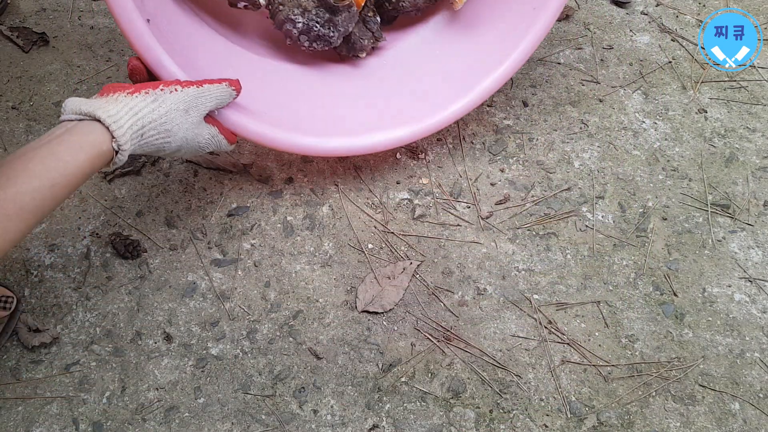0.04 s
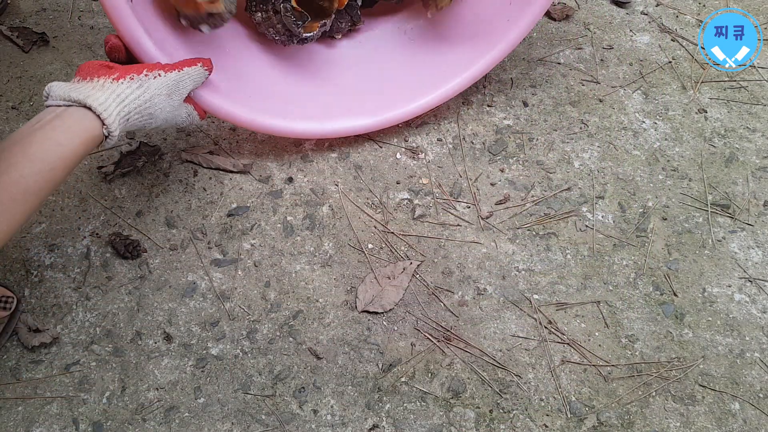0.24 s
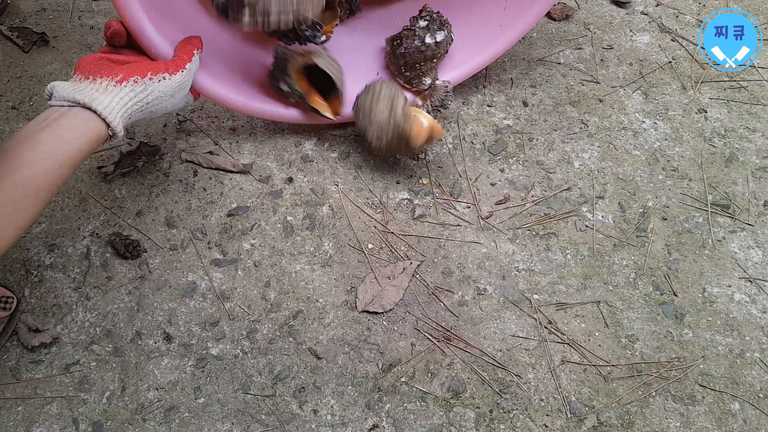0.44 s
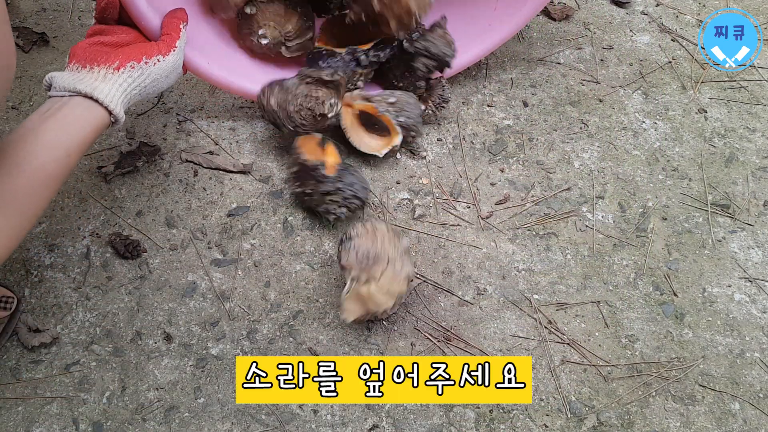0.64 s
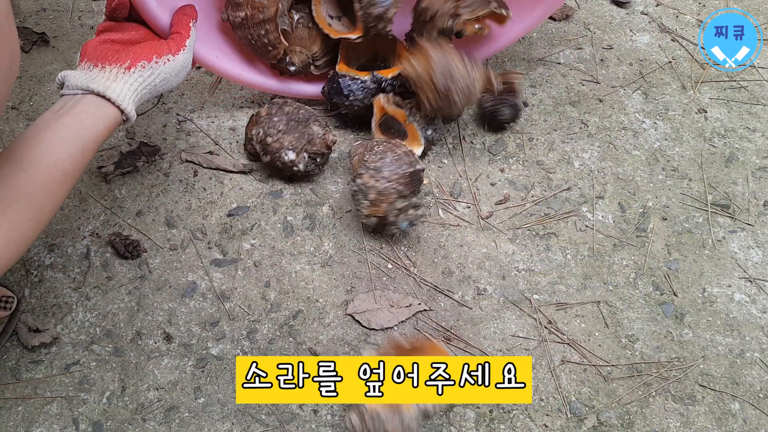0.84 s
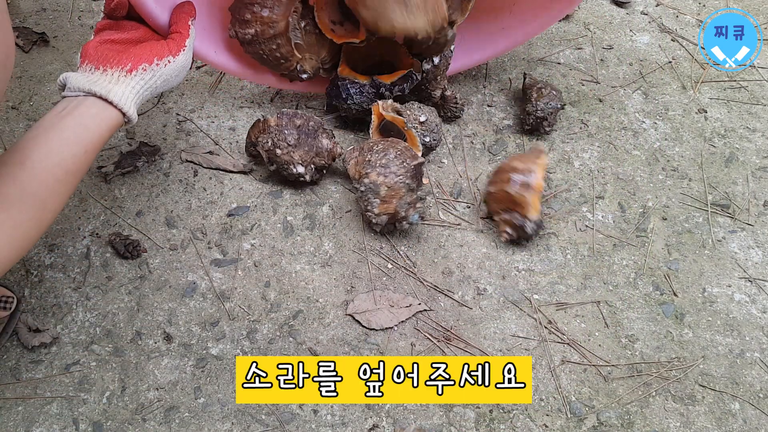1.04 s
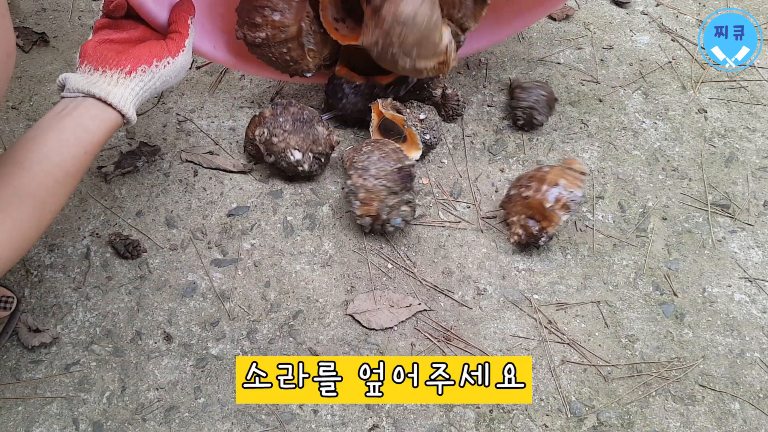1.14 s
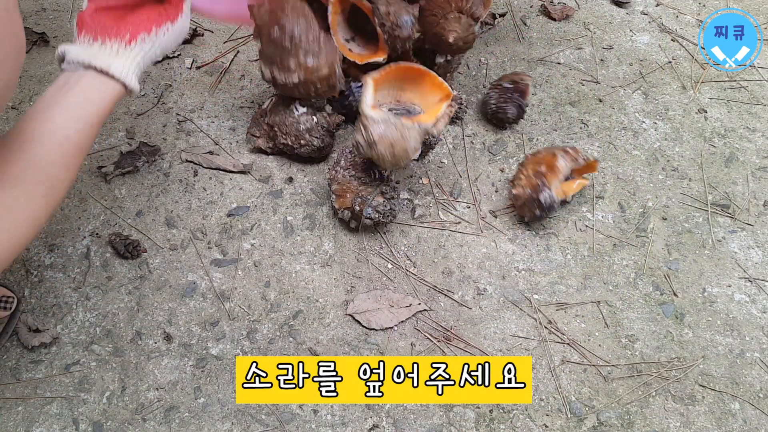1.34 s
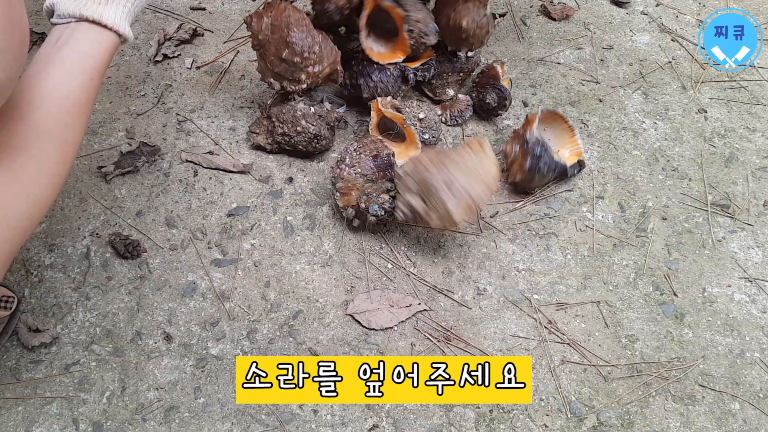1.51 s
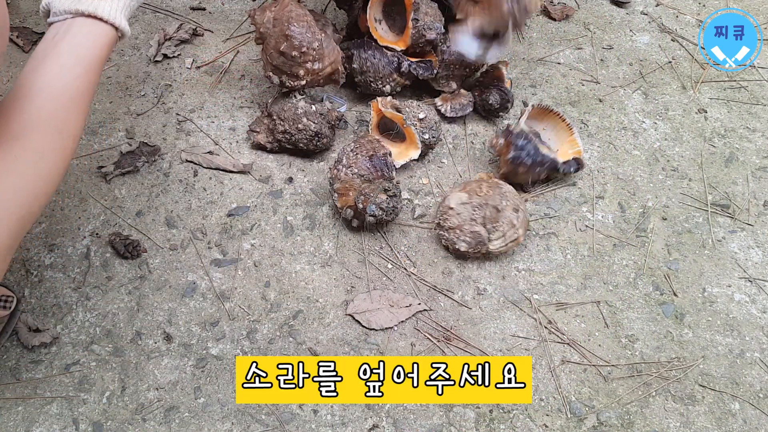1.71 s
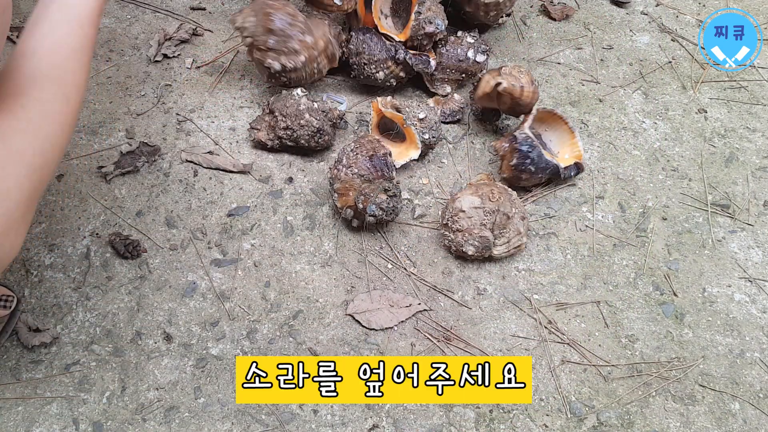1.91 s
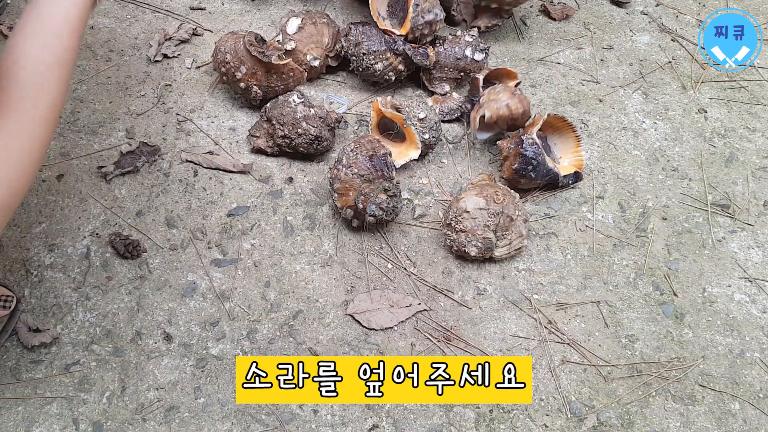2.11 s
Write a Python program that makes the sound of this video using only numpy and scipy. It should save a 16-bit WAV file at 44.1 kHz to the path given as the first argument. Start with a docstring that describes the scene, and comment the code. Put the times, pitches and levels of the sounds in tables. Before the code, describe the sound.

Heavy sea snail shells clatter from a plastic basin onto concrete, close up outdoors. Near silence until 0.1 s, then a dense, loud rattle of hollow knocks, hard raps, thin clinks and gritty crust crackle to about 0.9 s, with basin thumps and a low boom near 0.75. Sparser knocks follow, a renewed cluster at 1.35-1.5, a rap at 1.6, a thin shell bouncing brightly at 1.8, then light taps until about 2.1.

```python
"""Heavy sea snail shells slide out of a tipped plastic basin onto a concrete yard, close to two microphones.
Each blow excites decaying modes through a burst of contacts: hollow bodies knock, thin lips clink, thick
shells rap and the basin wall thumps. A dense rattle of random taps runs between the blows and thins out.
Crust cracks as bursts of filtered noise, and the basin booms as a slowly swelling and dying sine.
Short yard echoes and a quiet outdoor noise lie beneath."""
import sys
import numpy as np
from scipy import signal
from scipy.fft import rfft, irfft
from scipy.io import wavfile

SR = 44100
rng = np.random.default_rng(int(sys.argv[2]) if len(sys.argv) > 2 else 0)


def output_pcm(signal):
    """Save a mono or channel-first signal as 16-bit PCM at the path in sys.argv[1].

    Samples are clipped to [-1, 1] before scaling.
    """
    pcm = np.clip(np.atleast_2d(signal).T, -1, 1) * 32767
    wavfile.write(sys.argv[1], SR, np.round(pcm).astype(np.int16))


def invert_db(level):
    """Linear amplitude ratio for a level in decibels (20 dB per decade), elementwise."""
    return 10 ** (np.asarray(level, dtype=float) / 20)


N = 95388  # length of the scene in samples

# Spectrum of the outdoor background: (frequency [Hz], level [dB])
AIR_SPECTRUM = [(30, 7.5), (300, -12), (2500, -50), (5000, -14), (16000, -37)]
# Spectrum of crust and sand noise: (frequency [Hz], level [dB])
GRIT_SPECTRUM = [(2940, -1), (5000, 0), (6440, -4.5), (11700, -5), (15100, -5), (16000, -42)]
# Rattle between the blows: (time [s], level of shell bodies [dB], level of basin [dB])
RATTLE_LEVELS = [(0.066, -51, -44), (0.097, -26, -22.5), (.5, -24, -24.5), (0.757, -20.5, -26),
                 (.83, -32.5, -34), (.96, -36, -39), (1.02, -31, -36.5), (1.25, -29, -37),
                 (1.4, -20, -30.5), (1.679, -27.5, -36), (1.748, -41, -43), (2.16, -34, -42)]
# Crust cracking at hard contacts: (time [s], level [dB])
CRACKS = [(0.0907, -27), (0.179, -21.5), (0.2101, -17.5), (0.2782, -17), (0.4, -19.5), (0.468, -22),
          (0.508, -18), (0.5515, -18), (0.6455, -16), (0.7812, -17.5), (0.8646, -15), (0.9953, -18.5),
          (1.225, -28), (1.39, -24), (1.591, -21), (1.9371, -25.5)]
# Hollow knocks of shell bodies: (time [s], peak level [dB], pitch [Hz])
KNOCKS = [(0.11, -1.5, 974), (0.196, -4.5, 915), (0.211, -7.5, 890), (0.278, -10.5, 2075),
          (0.41, -1.5, 876), (0.445, 0, 1510), (0.461, -2, 890), (0.474, -2, 1136), (0.603, -6.5, 875),
          (0.648, -1, 1040), (0.684, -4, 993), (0.874, -6, 860), (1.005, -8, 1005), (1.028, -12, 946),
          (1.045, -16, 1580), (1.163, -12, 1274), (1.226, -11, 1323), (1.327, -14.5, 1584),
          (1.411, -13, 1626), (1.48, -6, 1386), (1.681, -14.5, 1740), (1.858, -18, 913),
          (1.863, -13.5, 1902), (1.946, -14.5, 1090), (2.002, -12, 1585), (2.098, -18, 1328)]
# Clinks of thin shell lips: (time [s], peak level [dB], pitch [Hz])
CLINKS = [(0.113, -13, 4810), (0.2114, -13, 3376), (0.2784, -21, 4020), (0.5092, -22, 4200),
          (0.5836, -7, 2870), (0.6486, -10.5, 3784), (0.6901, -6.5, 2970), (0.7376, -12.5, 4800),
          (0.7816, -12.5, 3814), (0.995, -15, 3810), (1.0221, -21.5, 4830), (1.1653, -13, 3430),
          (1.413, -11.5, 4624), (1.4504, -11, 4430), (1.545, -15, 4390), (2.0021, -16.5, 3940),
          (2.031, -16.5, 3900), (2.056, -16, 3460)]
# Shells thumping the basin wall: (time [s], peak level [dB], pitch [Hz])
THUMPS = [(0.202, -6, 264), (0.357, -12, 281), (0.448, -5.5, 240), (0.862, -15, 267), (1.637, -9, 234),
          (2.005, -21.5, 220)]
# Dry raps of a thick shell on concrete or on another shell: (time [s], peak level [dB], pitch [Hz])
RAPS = [(0.358, -5.5, 837), (0.399, 1.5, 1300), (0.552, -0.5, 1415), (0.584, 1, 1750), (0.866, -2, 740),
        (1.112, -3, 1623), (1.341, -6, 815), (1.361, -5.5, 920), (1.425, -3.5, 750), (1.434, -0.5, 983),
        (1.618, 0.5, 1274), (2.032, -11, 1000)]
# The whole basin booming: (time [s], level [dB])
BOOMS = [(.73, -18), (0.869, -31.5), (1.12, -33.5), (1.356, -20), (1.53, -25), (1.653, -27), (1.879, -28.5),
         (2.021, -29)]
# One thin shell bouncing on its own: (time [s], peak level [dB])
BOUNCES = [(1.791, -5.5), (1.807, -18.5), (1.819, -17)]
# Main modes of that thin shell: (frequency [Hz], level [dB], T60 [s])
THIN_SHELL_MODES = [(1905, -10, 0.078), (2391, 0, 0.048), (3954, 0.5, 0.064), (5220, -10, 0.076),
                    (10680, -14, 0.043)]
# Ways of ringing: (lowest mode [ratio to main], highest mode [ratio to main], crowd level [dB], T60 [s])
BODY_MODES = (0.8949, 1.8, -9, 0.0153)
WALL_MODES = (1.13, 2.0, -15, 0.08)
LIP_MODES = (.72, 1.25, -14, .035)
THICK_SHELL_MODES = (.55, 2.6, -5, .012)

# Phase between the microphones: mean lead of the left, and random spread up to 2 kHz
LEAD_RAD, SPREAD_RAD_PER_KHZ = 0.27, 0.97
CONTACTS_PER_S = 1500
KNOCK_S, CLINK_S, THUMP_S, RAP_S = 0.012, 0.0056, 0.0078, 0.0049  # decay constants of the contact bursts
RAP_RING_DB = -7  # body ringing added to the tap of a rap, relative to the dry part
LIPS_DB, GRIT_DB = -10, -8  # relative to the rattling bodies
GRIT_LEFT_DB = -1  # left over right, before the microphones
CRACK_T60_S, CRACK_TAIL_DB, TAIL_T60_S = 0.03, -0.5, 0.072
BOOM_HZ, BOOM_RISE_S, BOOM_T60_S = 58.6, 0.013, 0.34
RUMBLE_DB = -6.5  # relative to the rattling basin
YARD_DB, YARD_T60_S = -10, 0.053
AIR_DB = -52.5
LEFT_DB = 2.5  # gain of the left microphone over the right


def evened(x):
    """Normalization to unit rms."""
    return x / np.sqrt(np.mean(x ** 2) + 1e-20)


def add(mix, s, sound):
    """Linear superposition of a sound on the mix from time s, in place."""
    part = mix[:, round(s * SR):][:, :sound.shape[1]]
    part += sound[:, :part.shape[1]]


def coloured(points):
    """Spectral shaping: two channels of white noise are weighted by the given spectrum."""
    hz, db = np.transpose(points)
    bins = np.fft.rfftfreq(N, 1 / SR)
    gain = invert_db(np.interp(np.log(bins + 1), np.log(hz), db))
    white = rng.standard_normal((2, N))
    return evened(irfft(rfft(white) * gain, N))


def air():
    """Partial coherence: mixing two noises crosswise makes the background much alike at both microphones."""
    noise = coloured(AIR_SPECTRUM)
    return evened(noise + 0.79 * noise[::-1])


def ring(kind, main_hz, count=15):
    """Modal superposition: one tap excites a main mode and a crowd of weaker ones, phased per microphone."""
    lowest, highest, crowd_db, t60 = kind
    place = rng.random((count, 1))
    phase_draw, level_draw = rng.standard_normal((2, count, 1))
    main = np.arange(count)[:, None] == 0
    hz = main_hz * np.where(main, 1, lowest * (highest / lowest) ** place)
    t = np.arange(4000) / SR

    spread = np.where(main, phase_draw / 2, phase_draw)  # the main mode strays half as far
    turn = (LEAD_RAD + SPREAD_RAD_PER_KHZ * np.minimum(hz / 1000, 2) * spread) / 2

    octaves_away = abs(np.log2(hz / main_hz))
    mode_db = np.where(main, 0, crowd_db + 2 * level_draw - 5 * octaves_away)
    level = invert_db(mode_db - 60 * t / t60)
    level = level * (1 - np.exp(-t / 0.00016))  # the contact takes a moment
    return np.array([(level * np.sin(2 * np.pi * hz * t + side * turn)).sum(0) for side in (1, -1)])


def rattle_level(column):
    """Slow amplitude modulation: the tabulated level is interpolated in decibels."""
    rows = np.transpose(RATTLE_LEVELS)
    return invert_db(np.interp(np.arange(N) / SR, rows[0], rows[column]))


def rattle(modes, lo_hz, hi_hz, per_s, count=16):
    """Random impulse excitation: many small taps of unequal strength ring bodies of several sizes."""
    strength = invert_db(4 * np.minimum(rng.exponential(1, N), 3))
    taps = strength * (rng.random(N) < per_s / SR)
    which = rng.integers(0, count, N)
    total = np.zeros((2, N))
    for k, hz in enumerate(np.geomspace(lo_hz, hi_hz, count)):
        own_taps = taps * (which == k)
        total += signal.oaconvolve(ring(modes, hz), own_taps[None], axes=1)[:, :N]
    return evened(total)


def shell_rattle():
    """Superposed random taps on shell bodies and, more weakly, on their higher-pitched lips."""
    bodies = rattle(BODY_MODES, 703, 1767, 450)
    lips = rattle(LIP_MODES, 2830, 4760, 500)
    return (bodies + invert_db(LIPS_DB) * lips) * rattle_level(column=1)


def basin_rattle():
    """Random taps excite the longer-ringing modes of the basin wall."""
    return rattle(WALL_MODES, 185.0, 324.7, 200) * rattle_level(column=2)


def basin_rumble():
    """Low wall modes under random taps: sliding shells keep the basin rumbling, equal at both microphones."""
    rumble = rattle(WALL_MODES, 54, 99, 200).mean(0)
    return invert_db(RUMBLE_DB) * rumble * rattle_level(column=2)


def yard(x):
    """Reflection: sparse decaying echoes from ground, basin and nearby walls differ at each microphone."""
    t = np.arange(SR // 4) / SR
    signs = rng.choice([-1., 1.], (2, len(t)))
    present = rng.random((2, len(t))) < .04
    echoes = signs * present * invert_db(-60 * t / YARD_T60_S) * (t > .002)
    echoes = echoes / np.linalg.norm(echoes, axis=1)[:, None]
    wet = signal.fftconvolve(x, echoes, axes=1)[:, :N]
    return signal.lfilter(*signal.butter(1, 500, "high", fs=SR), wet)


def grit():
    """Modulated noise: crust and sand hiss in bursts at the cracks and crackle randomly under the sliding."""
    t = np.arange(6000) / SR
    bursts = np.zeros((1, N))
    for s, db in CRACKS:
        snap = invert_db(db - 60 * t / CRACK_T60_S)
        tail = invert_db(db + CRACK_TAIL_DB - 60 * t / TAIL_T60_S)
        add(bursts, s, (snap + tail)[None] / 2)

    ticks = invert_db(6.3 * np.minimum(rng.exponential(1, N), 3)) * (rng.random(N) < 300 / SR)
    crackle = evened(0.55 + signal.oaconvolve(ticks, invert_db(-60 * t / CRACK_T60_S))[:N])
    crackle = crackle * invert_db(GRIT_DB) * rattle_level(column=1)

    lean = invert_db(np.array([[GRIT_LEFT_DB / 2], [-GRIT_LEFT_DB / 2]]))
    return lean * coloured(GRIT_SPECTRUM) * (bursts + crackle)


def blow(tap, db, length):
    """Repeated contact: a knobbly surface touches several times, weaker on average, convolved with one tap."""
    t = np.arange(2000) / SR
    touches = rng.random(2000) < CONTACTS_PER_S / SR
    strength = rng.standard_normal(2000)
    push = touches * strength * 0.42 * np.exp(-t / length)
    push[0] = 1
    sound = signal.fftconvolve(tap, push[None], axes=1)
    return invert_db(db) * sound / abs(sound.mean(0)).max()  # peak set on the mean of the channels


def knocks():
    """Modal ringing of hollow shell bodies under a contact burst."""
    out = np.zeros((2, N))
    for s, db, hz in KNOCKS:
        add(out, s, blow(ring(BODY_MODES, hz), db, KNOCK_S))
    return out


def clinks():
    """Modal ringing of thin shell lips at high pitch under a shorter contact burst."""
    out = np.zeros((2, N))
    for s, db, hz in CLINKS:
        add(out, s, blow(ring(LIP_MODES, hz), db, CLINK_S))
    return out


def thumps():
    """Modal ringing of the basin wall at low pitch, struck by shells."""
    out = np.zeros((2, N))
    for s, db, hz in THUMPS:
        add(out, s, blow(ring(WALL_MODES, hz), db, THUMP_S))
    return out


def raps():
    """Strong damping: widely spread, fast-dying modes of a thick shell, with some body ringing added."""
    out = np.zeros((2, N))
    for s, db, hz in RAPS:
        tap = ring(THICK_SHELL_MODES, hz) + invert_db(RAP_RING_DB) * ring(BODY_MODES, hz)
        add(out, s, blow(tap, db, RAP_S))
    return out


def booms():
    """Resonance build-up and decay: the lowest mode of the basin swells and dies slowly."""
    out = np.zeros((2, N))
    t = np.arange(SR // 2) / SR
    for s, db in BOOMS:
        swell = (1 - np.exp(-t / BOOM_RISE_S)) ** 2 * invert_db(db - 60 * t / BOOM_T60_S)
        add(out, s, np.ones((2, 1)) * swell * np.sin(2 * np.pi * BOOM_HZ * t) * 2)
    return out


def bounces():
    """Modal superposition with separate decay times: one thin shell rings at each of its bounces."""
    out = np.zeros((2, N))
    for s, db in BOUNCES:
        tap = np.zeros((2, 4000))
        for hz, mode_db, t60 in THIN_SHELL_MODES:
            tap += invert_db(mode_db) * ring((*LIP_MODES[:-1], t60), hz)
        add(out, s, blow(tap, db, RAP_S))
    return out


def scene():
    """Superposition of the direct sound, its yard echoes, the basin's bass and the background."""
    blows = knocks() + clinks() + thumps() + raps() + bounces()
    shells = shell_rattle() + basin_rattle() + grit() + blows
    no_bass = signal.butter(3, 160, "high", fs=SR, output="sos")  # shells, wall thumps, rattle and grit carry no bass below 160 Hz
    shells = signal.sosfilt(no_bass, shells)
    basin = basin_rumble() + booms()
    return shells + invert_db(YARD_DB) * yard(shells) + basin + invert_db(AIR_DB) * air()


def low_pass(x):
    """Removes everything above the highest recorded frequency."""
    return signal.sosfilt(signal.butter(12, 16970, fs=SR, output="sos"), x)


def record(dry):
    """Transduction: the microphones lose the deepest bass, the left is a little nearer, loud peaks round off."""
    picked_up = signal.lfilter(*signal.butter(2, 42, "high", fs=SR), dry)
    nearness = invert_db(np.array([[LEFT_DB / 2], [-LEFT_DB / 2]]))
    rounded = np.tanh(picked_up * nearness)
    band_limit = signal.firwin(255, 16600, window=("kaiser", 8), fs=SR)
    mix = signal.oaconvolve(rounded, band_limit[None], "same", axes=1)
    return low_pass(mix)


dry = scene()
out = record(dry)
output_pcm(out)
```